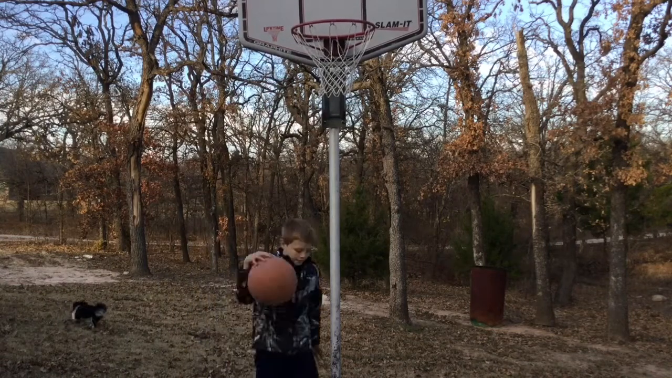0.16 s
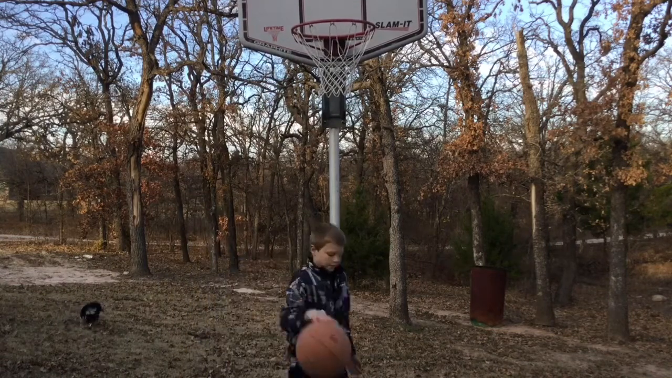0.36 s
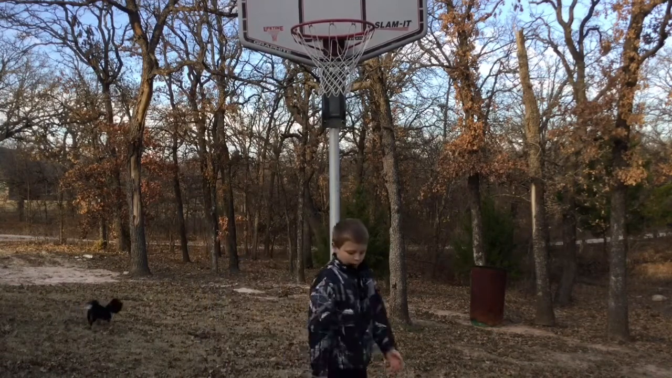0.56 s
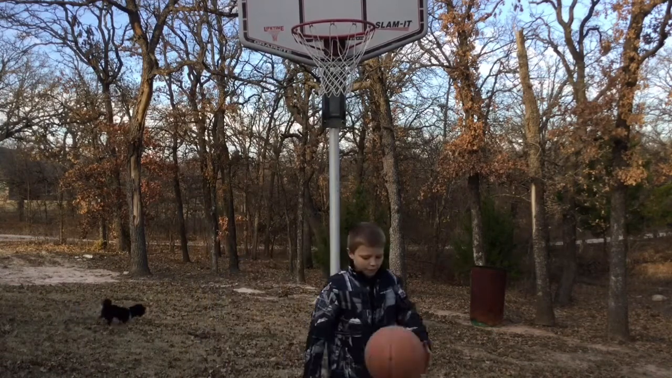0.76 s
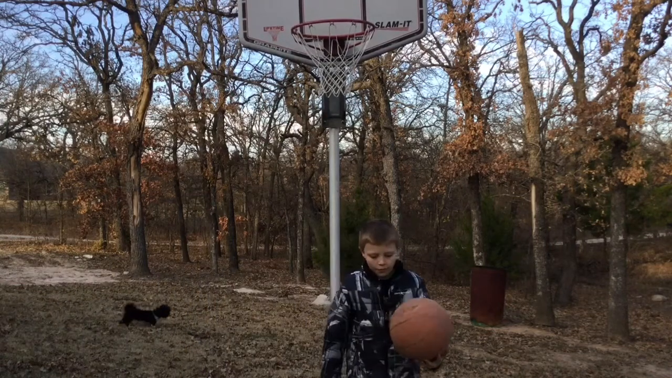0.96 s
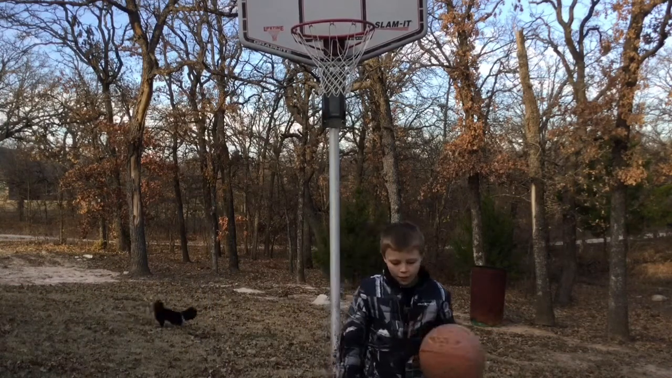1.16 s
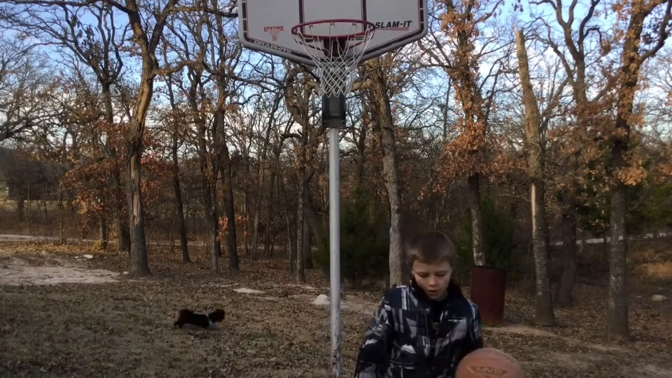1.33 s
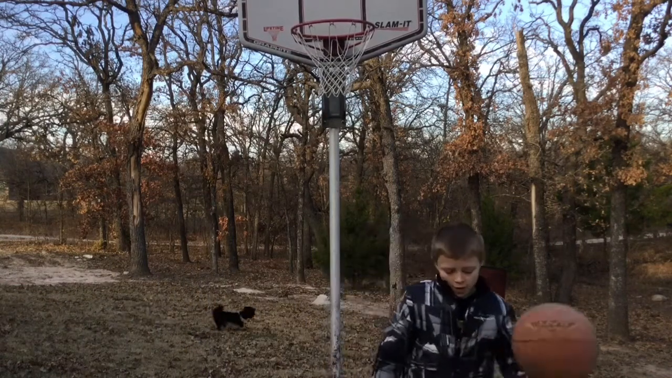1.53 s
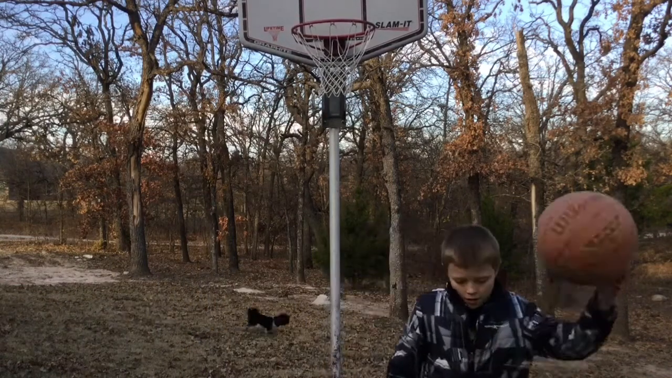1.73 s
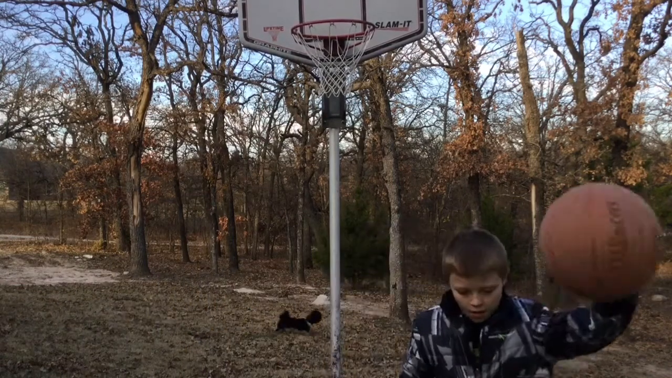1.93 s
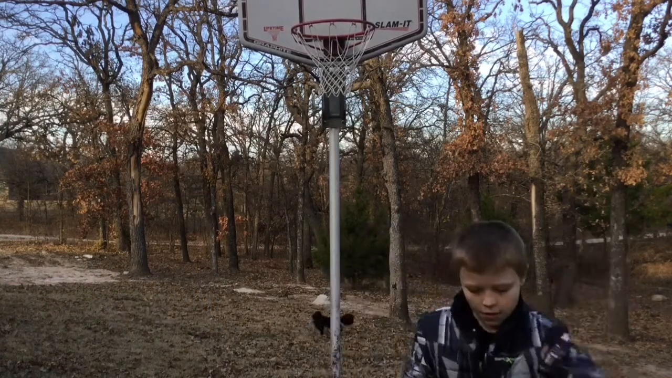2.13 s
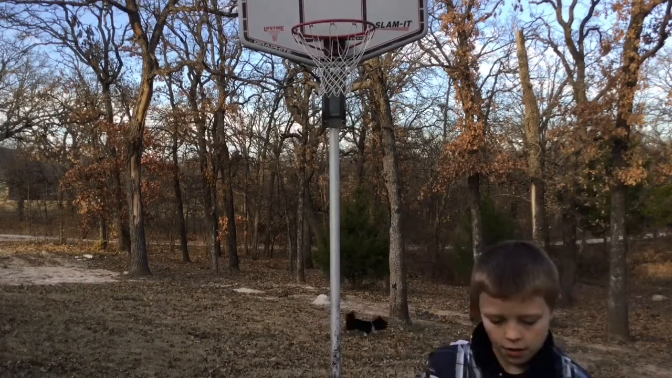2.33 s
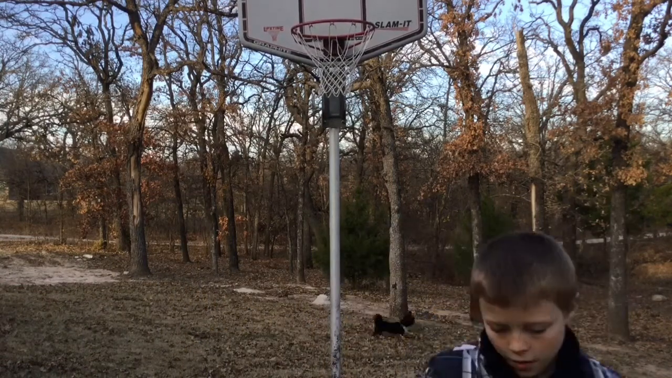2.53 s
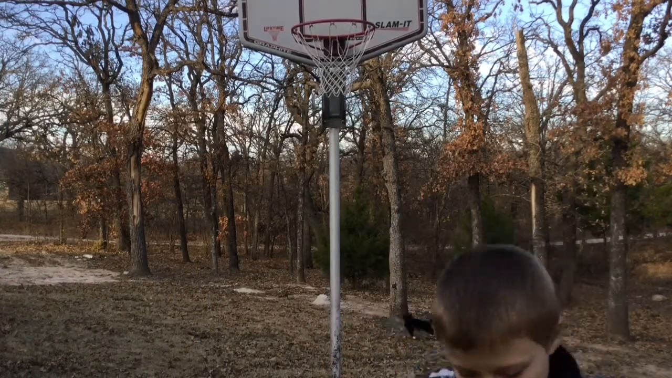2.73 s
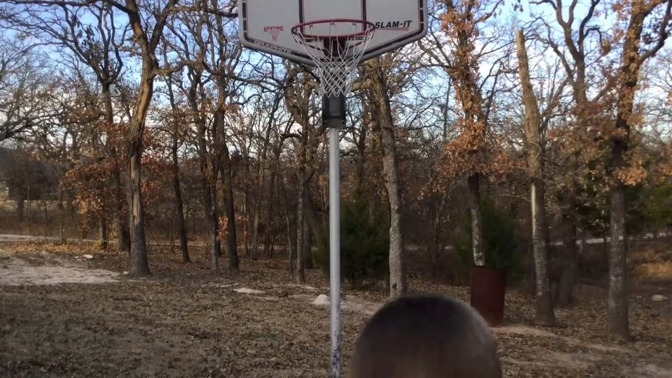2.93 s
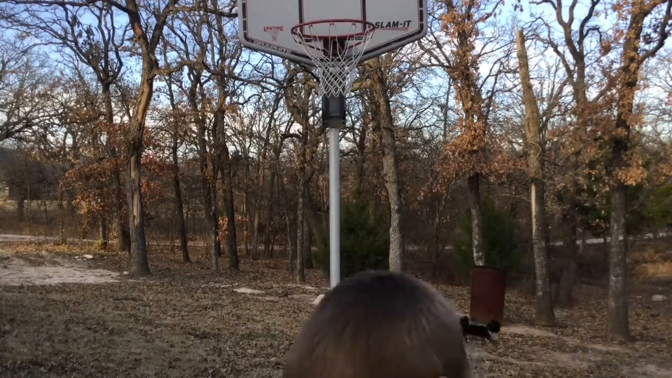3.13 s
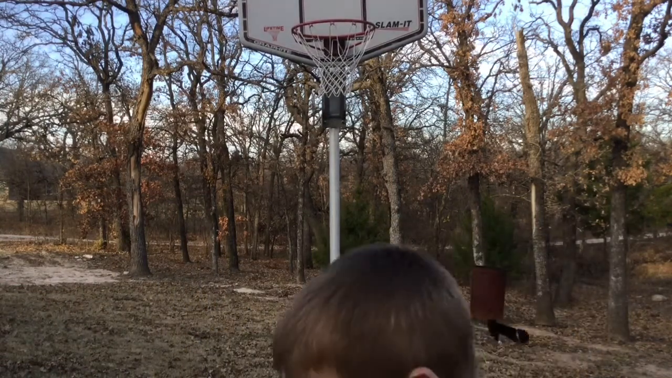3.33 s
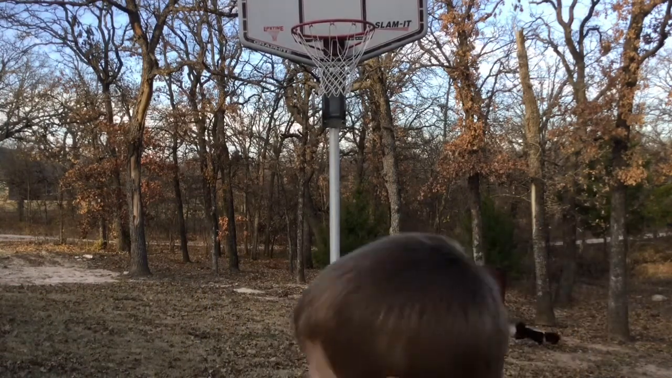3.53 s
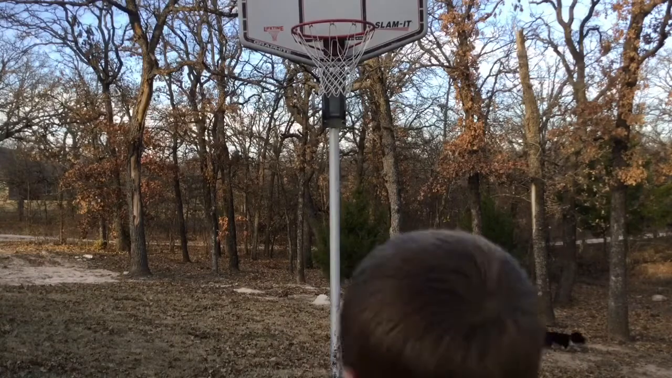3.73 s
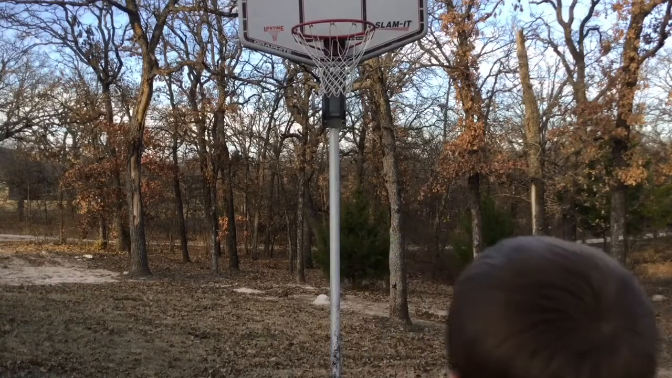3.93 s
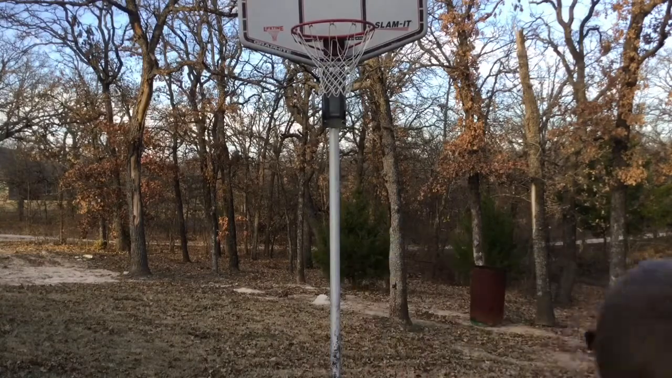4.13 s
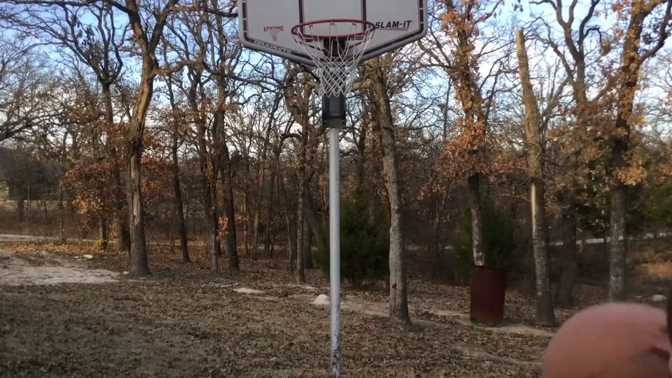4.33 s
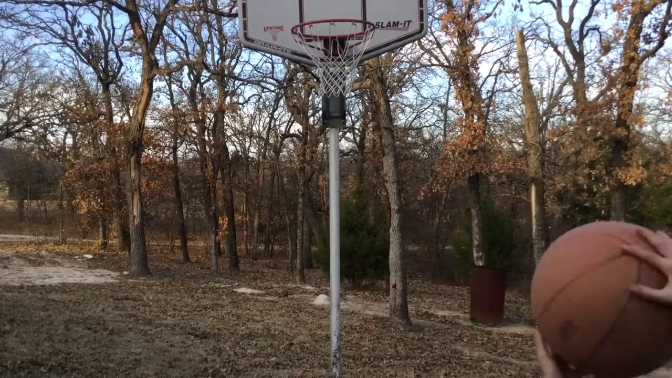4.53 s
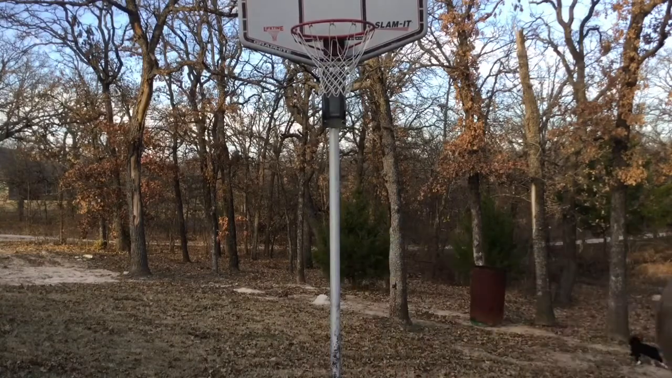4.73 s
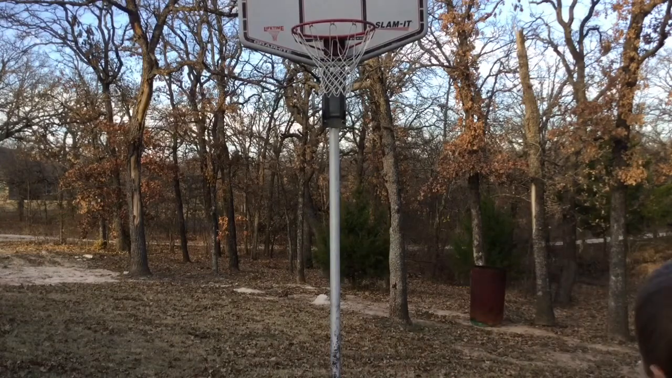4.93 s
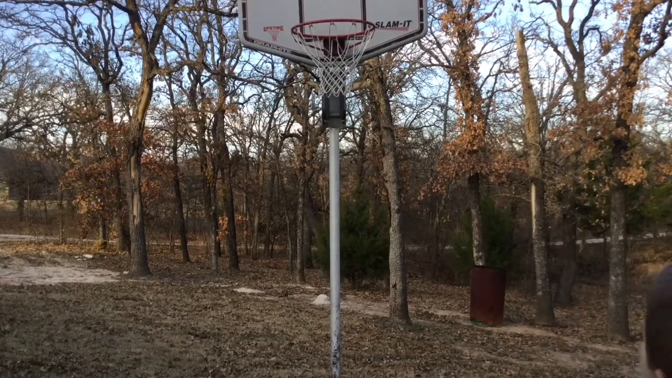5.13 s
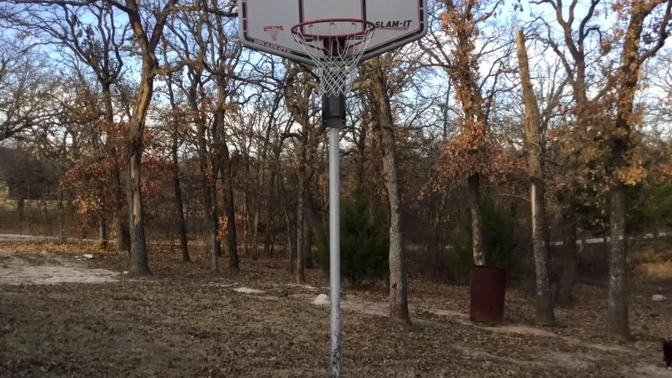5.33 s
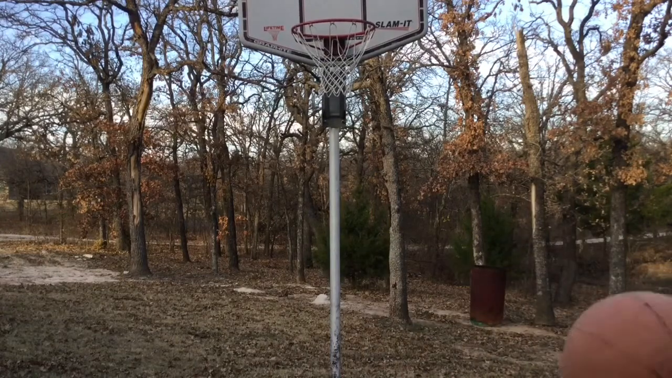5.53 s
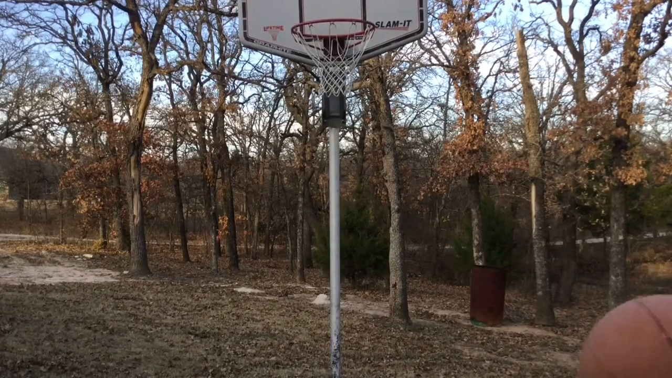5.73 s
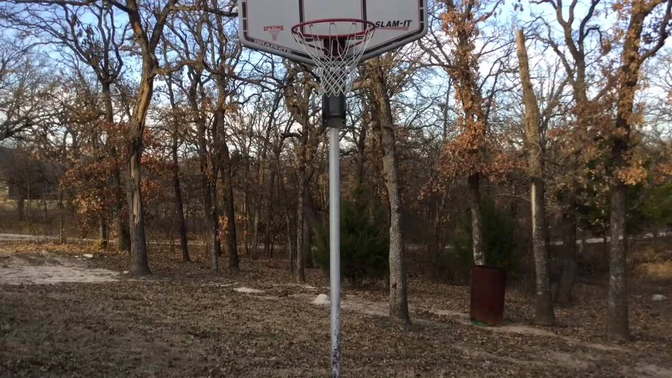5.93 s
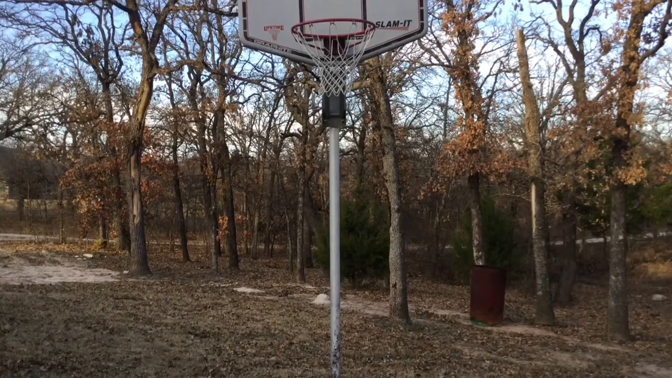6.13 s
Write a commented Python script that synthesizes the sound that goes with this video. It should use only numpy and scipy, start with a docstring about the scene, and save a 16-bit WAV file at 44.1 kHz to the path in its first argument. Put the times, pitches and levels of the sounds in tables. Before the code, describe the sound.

A basketball slaps hard dry ground three times with outdoor echo, between hand pats, nylon jacket swishes and crackling dry leaves, over a faint distant hum.

```python
"""A basketball is bounced three times on hard dry ground in a wooded yard, close to the microphone.
Each bounce is a slap, a thump of the shell and a faint ping of the air inside, all built from ringing
modes; delayed echoes and fading bands of noise throw it back as wall and trees do.
Between them hands pat and rub the ball, a nylon jacket swishes and dry leaves crunch, from filtered noise
and grains. Short falling chirps are heard faintly, and far off a machine hums in wavering sines over dull noise."""
import sys
import numpy as np
from scipy import signal
from scipy.fft import rfft, irfft
from scipy.io import wavfile

SR = 44100
rng = np.random.default_rng(int(sys.argv[2]) if len(sys.argv) > 2 else 0)


def generate_wav(signal):
    """Clip the signal to [-1, 1] and save it as 16-bit WAV at the path in sys.argv[1]."""
    frames = np.transpose(np.atleast_2d(signal))
    scaled = np.clip(frames, -1, 1) * 32767
    pcm = np.round(scaled).astype(np.int16)
    wavfile.write(sys.argv[1], SR, pcm)


N = 276948
TIME = np.arange(N) / SR


def from_db(db):
    """Decibels to gain."""
    return 10 ** (np.asarray(db) / 20)


def rms_one(x):
    """Scale to rms 1."""
    return x / np.sqrt(np.mean(x ** 2) + 1e-20)


def at_hz(points, hz):
    """Read a table on a log-frequency axis."""
    f, value = np.transpose(points)
    return np.interp(np.log(hz), np.log(f), value)


def cut(x, hz, kind="low", order=2):
    """Butterworth filter."""
    corner = np.clip(hz, 10, .47 * SR)
    return signal.sosfilt(signal.butter(order, corner, kind, fs=SR, output="sos"), x + 1e-18)


def add(out, s, sound):
    """Mix a sound in at time s."""
    at = int(np.clip(round(s * SR), 0, N - 1))
    out[at:at + len(sound)] += sound[:N - at]


def drift(rate):
    """Smooth random wander of rms 1, rolling off above rate in Hz."""
    coarse = np.arange(0, N + 32, 32)
    hz = np.fft.rfftfreq(len(coarse), 32 / SR)
    spectrum = rfft(rng.standard_normal(len(coarse))) / (1 + (hz / rate) ** 2) ** 2
    slow = irfft(spectrum, len(coarse))
    return np.interp(np.arange(N), coarse, rms_one(slow))


def colour(x, spectrum):
    """Give a steady noise a spectrum; rms 1."""
    gain = from_db(at_hz(spectrum, np.fft.rfftfreq(N, 1 / SR) + 1))
    return rms_one(irfft(rfft(x) * gain, N))


def dying(t60):
    """One second of exponential decay, down 60 dB after t60 seconds."""
    return np.exp(-np.log(1000) * TIME[:SR] / max(t60, .001))


def ring(hz, t60):
    """A struck mode: a sine that dies away."""
    return np.sin(2 * np.pi * hz * TIME[:SR]) * dying(t60)


def resonate(x, hz, q):
    """One broad resonance."""
    hz = min(hz, .4 * SR)
    return signal.lfilter(*signal.iirpeak(hz, max(q, hz / (.3 * SR)), fs=SR), x + 1e-18)


def grains(per_s, spread_db):
    """Random tiny clicks of uneven size."""
    sizes = from_db(spread_db * np.minimum(rng.exponential(1, N), 4))
    return (rng.random(N) < per_s / SR) * sizes * rng.choice([-1, 1], N)


def contacts(table, q, top_hz):
    """Short bursts of friction through one resonance each."""
    out, length = np.zeros(N), SR // 10
    for s, db, hz, t60 in table:
        friction = rng.standard_normal(length) * dying(t60)[:length]
        burst = cut(resonate(friction, hz, q), top_hz)
        add(out, s, from_db(db) * burst / np.abs(burst).max())
    return out


def far_air():
    """Far noise, its treble lost with distance."""
    # spectrum of the distance: f/Hz, relative level/dB
    air_spectrum = [(18, -85), (30, -53), (90, -17), (109, -9.5), (129, -7.5), (147, -12.5), (167, -5.5),
                    (205, -5), (333, -6.5), (450, -12.5), (595, -7), (641, -14), (1100, -15.5),
                    (1600, -32.5), (2600, -55), (3380, -81.5), (5720, -120)]
    return from_db(-58.3) * cut(colour(rng.standard_normal(N), air_spectrum), hz=1600, order=5)


def far_machine():
    """A machine hum: steady partials whose level and pitch waver independently."""
    # partials of the far machine: f/Hz, level/dB (rms, before the waver)
    partials = [(119.6, -74), (179.5, -65.5), (239, -72), (359.5, -74.5), (479, -73), (599, -67)]
    out = np.zeros(N)
    for hz, db in partials:
        level = from_db(db + 1.7 * drift(7.9))
        phase = 2 * np.pi * np.cumsum(hz + 1.2 * drift(6.67)) / SR
        out += level * np.sqrt(2) * np.sin(phase)
    return out


def chirps():
    """Short, nearly pure falling notes with a slight waver."""
    # faint chirps: middle t/s, half length (to 1/e) t/s, peak level/dB, middle f/Hz
    calls = [(0.549, 0.018, -61.5, 2990), (1.04, 0.0062, -59, 3420), (1.216, 0.0074, -57, 3310),
             (3.921, 0.0036, -64, 3420), (5.727, 0.013, -75, 5160), (5.987, 0.0036, -63, 3350)]
    glide_hz_per_s = -2500
    out, waver_hz = np.zeros(N), 40 * drift(130)
    for s, half, db, hz in calls:
        near = np.abs(TIME - s) < 3 * half
        t = TIME[near] - s
        pitch = hz + glide_hz_per_s * t + waver_hz[near]
        out[near] += from_db(db) * np.exp(-(t / half) ** 2) * np.sin(2 * np.pi * np.cumsum(pitch) / SR)
    return out


def scuffs():
    """Dense crackle of a hand sliding on the ball and of shoes in dry leaves, each swelling and fading."""
    # scuffs: a hand rubbing the ball (first row, low and dull), then shoes on dry leaves:
    # middle t/s, half length (to 1/e) t/s, relative level/dB, f/Hz, sharpness Q
    rubs = [(.205, .055, -47, 695, 0.29), (.831, 0.029, -57, 1510, 0.12), (3.412, 0.064, -48, 3340, 0.69),
            (3.816, 0.024, -52.5, 3620, 2), (4.169, 0.034, -52.5, 3110, 6.7),
            (4.531, 0.024, -57.5, 2426, .37), (5.024, 0.025, -67.5, 2330, 0.45),
            (5.823, 0.013, -72.5, 3890, 0.53)]
    out, crackle = np.zeros(N), grains(per_s=3600, spread_db=6.0)
    for s, half, db, hz, q in rubs:
        near = np.abs(TIME - s) < 3 * half
        scrape = cut(resonate(crackle[near], hz, q), 1.1 * hz)
        swell = np.exp(-((TIME[near] - s) / half) ** 2)
        out[near] += from_db(db) * rms_one(scrape) * swell
    return out


def stroke(start, hold):
    """Gain of one arm movement: every one swells, holds and dies away alike."""
    rise_db_per_s, fall_db_per_s = 598, 478
    early = np.maximum(start - TIME, 0)
    late = np.maximum(TIME - start - hold, 0)
    return from_db(-np.minimum(rise_db_per_s * early + fall_db_per_s * late, 120))


def jacket():
    """Nylon threads catch and slip in fine grains that follow the arms; folds flutter, a sleeve rasps below."""
    # arm strokes: start of hold t/s, hold t/s, relative swish level/dB, relative sleeve rasp level/dB
    strokes = [(0.024, 0.017, -62.5, -62), (0.151, 0.22, -62, -59.5), (0.421, 0.038, -63.5, -67),
               (0.584, 0.2, -63, -71.5), (0.787, 0.066, -58.5, -71), (1.002, 0.17, -62.5, -66.5),
               (1.187, 0.034, -58.5, -71), (1.282, 0.16, -52.5, -67), (1.508, 0.093, -48.5, -60),
               (1.627, 0.19, -56, -60.5), (1.803, 0.12, -52, -63), (1.994, .015, -64, -80),
               (2.078, 0.058, -60.5, -74), (2.218, 0.17, -52, -60.5), (2.427, 0.11, -58.5, -71),
               (2.639, 0.19, -64, -61.5), (2.871, 0.051, -60, -56.5), (3.735, 0.083, -53, -63),
               (4.244, 0.019, -61, -61.5)]
    # spectrum of the nylon: f/Hz, relative level/dB
    nylon_spectrum = [(1470, -32), (2500, -26), (3440, -7.5), (4340, -7), (6600, -7), (10300, -7.5),
                      (11700, -7), (15000, -10.5), (16000, -9.5)]
    swish_level, rasp_level = np.zeros(N), np.zeros(N)
    for start, hold, swish_db, rasp_db in strokes:
        motion = stroke(start, hold)
        swish_level = np.maximum(swish_level, from_db(swish_db) * motion)
        rasp_level = np.maximum(rasp_level, from_db(rasp_db) * motion)
    threads = colour(grains(per_s=21000, spread_db=6.0), nylon_spectrum)
    edges = np.geomspace(1500, 19000, 9)
    folds = np.zeros(N)
    for low, high in zip(edges, edges[1:]):   # each fold flutters in its own band
        folds += cut(threads, [low, high], "band", order=1) * from_db(2.5 * drift(45))
    swish = rms_one(folds * from_db(1.9 * drift(74)))
    # the sleeve drags over the chest
    drag = resonate(grains(per_s=2900, spread_db=4.5), hz=2263, q=1.9)
    rasp = rms_one(cut(drag, hz=2630))
    return from_db(-0.87) * swish_level * swish + from_db(-1.6) * rasp_level * rasp


def near_body(x, count=3):
    """Short reflections off body, ball and ground comb the sound, and shift as the player moves."""
    paths = [delay * (1 + .12 * drift(1.5)) for delay in np.geomspace(.0007, .003, count)]   # s
    return x + sum(.45 * np.interp(TIME - delay, TIME, x) for delay in paths)


def snaps():
    """Twigs break with a dry tick; nylon folds flick open with a brighter, longer one."""
    # twigs and dry leaves breaking underfoot: t/s, peak level/dB
    twig_breaks = [(3.3861, -33.5), (3.403, -28), (3.427, -32.5), (3.5012, -36.5), (4.1553, -41.5),
                   (4.1744, -33), (4.192, -30), (4.2028, -32), (4.513, -44)]
    # folds of the jacket snapping taut: t/s, peak level/dB
    fold_flicks = [(.4402, -35), (.696, -45), (1.5095, -38), (2.177, -41.5), (4.176, -40)]
    twig_hz, twig_t60_s = 3134, .007
    crease_hz, crease_t60_s = 6650, 0.048
    twigs = contacts([(s, db, twig_hz, twig_t60_s) for s, db in twig_breaks], q=2.5, top_hz=8200)
    creases = contacts([(s, db, crease_hz, crease_t60_s) for s, db in fold_flicks], q=1.6, top_hz=8050)
    return twigs + creases


def pats():
    """Fingers tap the ball briefly; the palm lands lower and longer."""
    # hands on the ball: t/s, relative peak level/dB, body f/Hz
    hands = [(0.0254, -44, 1870), (0.1542, -26, 2694), (0.2023, -30.5, 1228), (0.2218, -29.5, 805),
             (0.244, -25.5, 1100), (0.298, -38, 1379), (0.353, -42, 252), (1.8196, -32.5, 2000),
             (1.87, -41, 1894), (2.3284, -33, 1279), (4.553, -51, 278)]
    t60_at_1khz_s, softness = 0.029, .4   # a lower touch lasts longer by this power
    touches = [(s, db, hz, t60_at_1khz_s * (1000 / hz) ** softness) for s, db, hz in hands]
    return cut(contacts(touches, q=1.0, top_hz=8350), hz=129.3, kind="high")


def echoes(x):
    """A few dull returns from large surfaces nearby."""
    # near echoes: delay t/s, level/dB, top f/Hz
    returns = [(0.0142, -14.5, 1483), (.035, -23.5, 2458), (0.042, -37, 500)]
    out = np.zeros(len(x))
    for delay, db, top_hz in returns:
        lag = int(delay * SR)
        out[lag:] += from_db(db) * cut(x, top_hz, order=1)[:len(x) - lag]
    return out


def trees():
    """Diffuse response of trunks and ground: noise bands, each dying at its own rate, arriving in clumps."""
    # strength of the scatter: f/Hz, relative level/dB
    scatter_level = [(60, -22.5), (120, -10), (240, -24), (450, -23), (750, -16.5), (1150, -14.5),
                     (1800, -22.5), (2700, -20.5), (6000, -24), (15000, -29)]
    # decay of the scatter: f/Hz, t60/s
    scatter_decay = [(100, 0.41), (300, 0.59), (1000, 0.58), (3000, 0.71), (7000, 0.23), (14000, .3)]
    out, edges = np.zeros(SR), np.geomspace(45, 17000, 15)
    clumps = np.interp(TIME[:SR], np.linspace(0, 1, 200), from_db(1.8 * rng.standard_normal(200)))
    arrival = clumps * (1 - np.exp(-(TIME[:SR] / 0.0043) ** 2))
    for low, high in zip(edges, edges[1:]):
        hz = np.sqrt(low * high)
        fade = arrival * (dying(at_hz(scatter_decay, hz)) + from_db(4) * dying(0.12))
        band = cut(rng.standard_normal(SR), [low, high], "band")
        out += from_db(at_hz(scatter_level, hz)) * band * fade / np.linalg.norm(fade)
    return out


def yard(x):
    """Echoes and the scatter of the trees."""
    return echoes(x) + signal.fftconvolve(x, trees())[:len(x)]


def bounce(thump_db, slap_db, pitch, top_hz, ping_db, yard_db, contact_s, lift_db, off_centre_db):
    """The shell slaps, crushes grit, flexes and peels off the ground; the air inside rings on."""
    # flexing of the shell: f/Hz (before the pitch ratio), relative level/dB, t60/s, polarity
    shell_modes = [(90, -18.5, 0.044, -1), (189, -17, 0.067, 1), (255.5, 10, 0.0375, 1),
                   (259.76, 9, 0.049, -1), (337.3, -11.5, 0.043, -1)]
    # rubber slapping the ground: f/Hz, relative level/dB, t60/s
    slap_modes = [(476, -17.5, 0.028), (700, -21, 0.026), (872, -19, 0.02), (1186, -17.5, 0.025),
                  (1378, -4.5, 0.011), (1650, -21.5, 0.0074), (2001, -16, 0.021), (2500, -8.5, 0.0086),
                  (3050, -8.5, 0.0068), (4085, -11.5, 0.0094), (4950, -15.5, 0.0083), (5533, -15, 0.008),
                  (7650, -22.5, 0.0047), (8510, -28, 0.0046)]
    # air inside the ball: f/Hz, relative level/dB, t60/s
    cavity_modes = [(933, -41.5, 0.22), (1157, -43.5, 0.44), (1550, -51.5, .25), (1920, -52, 0.2),
                    (2165, -45.5, 0.37), (2650, -46, 0.29), (2651, -41.5, 0.32), (2714, -49, 0.97),
                    (2730, -49, 0.94), (2990, -49.5, 0.5), (3130, -48.5, .45), (3470, -53, 0.74),
                    (3520, -54.5, 0.41), (4124, -55.5, 0.76), (4370, -51, 0.15), (4570, -61, 0.25),
                    (5140, -55, 0.35), (6900, -61.5, 0.21)]
    shell = sum(np.sign(sign) * from_db(db) * ring(hz * pitch, t60) for hz, db, t60, sign in shell_modes)
    # a glancing blow wakes a higher mode
    shell = shell - from_db(off_centre_db) * ring(hz=391, t60=0.053)
    thump = from_db(thump_db) * cut(cut(shell, hz=570, order=4), hz=84.06, kind="high", order=3)
    # the contact patch spreads, so the low notes of the slap start a little after the high ones
    slap = sum(from_db(db) * np.roll(ring(hz, t60), int(.5 * SR / hz)) for hz, db, t60 in slap_modes)
    crush = from_db(-18) * dying(0.014) + from_db(-29) * dying(.05)
    peel = from_db(lift_db) * np.roll(dying(.025), int(contact_s * SR))
    grit = cut(rng.standard_normal(SR) * (crush + peel), hz=[600, 8000], kind="band")
    strike = cut(cut(slap, hz=480.3, kind="high") + grit, top_hz, order=1)
    direct = thump + from_db(slap_db) * strike
    ping = from_db(ping_db) * sum(from_db(db) * ring(hz, t60) for hz, db, t60 in cavity_modes)
    # summed over all directions the slap is one smooth crack, and this is what the trees send back
    click = cut(signal.unit_impulse(SR), hz=[450, 4500], kind="band", order=1)
    crack = from_db(23) * cut(click, top_hz, order=1)
    scatter = signal.fftconvolve(thump + crack, trees())[:SR]
    return direct + ping + from_db(yard_db) * (echoes(direct) + scatter)


def dribble():
    """The ball meets the ground once per row, each blow with its own levels, pitch and brightness."""
    # bounces: t/s, thump level/dB, slap level/dB, shell pitch ratio, slap top f/Hz, ping level/dB,
    # yard level/dB, time on the ground t/s, lift-off level/dB, off-centre mode level/dB (all relative)
    blows = [(0.5813, -0.2, 1, 0.95, 5480, -10, 1.5, 0.013, -30.5, -38),
             (2.3571, 1.3, 3, 1.0, 13000, 0, 1.5, 0.019, -29, -21),
             (3.0421, -1.5, 0.3, 0.99, 5500, -2.5, 2.5, 0.03, -35, -13)]
    out = np.zeros(N)
    for s, *blow in blows:
        add(out, s, bounce(*blow))
    return out


def scene():
    """Ball and player close by, the yard answering, the distance behind and a faint hiss."""
    rustle = from_db(-1.0) * near_body(cut(scuffs(), hz=131.4, kind="high") + jacket())
    small = from_db(-1.5) * pats() + snaps() + rustle + chirps()
    background = far_air() + far_machine()
    hiss = from_db(-91) * rng.standard_normal(N)
    return (dribble() + small + from_db(1.0) * yard(small) + background + hiss)[None]


def record(dry):
    """The microphone loses the deep bass and rounds the highest peaks; the top is cut."""
    cutoff_hz = 16200
    heard = cut(dry, hz=25, kind="high")
    heard = heard / (1 + (heard / .9) ** 6) ** (1 / 6)
    return signal.sosfilt(signal.ellip(10, .1, 80, cutoff_hz, fs=SR, output="sos"), heard)


dry = scene()
out = record(dry)
generate_wav(out)
```